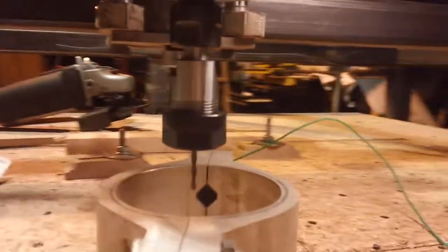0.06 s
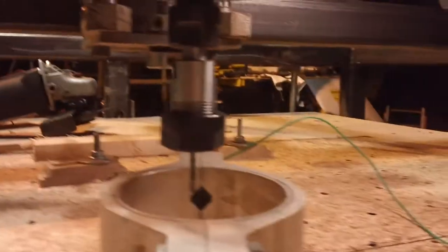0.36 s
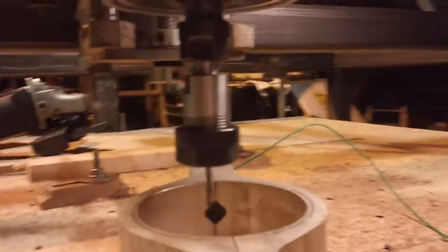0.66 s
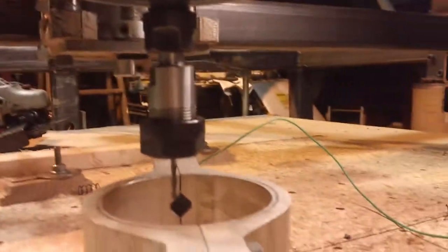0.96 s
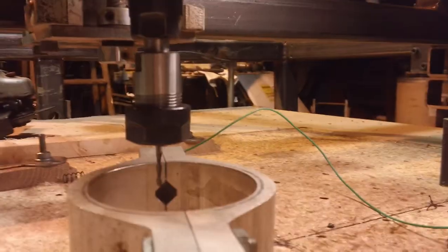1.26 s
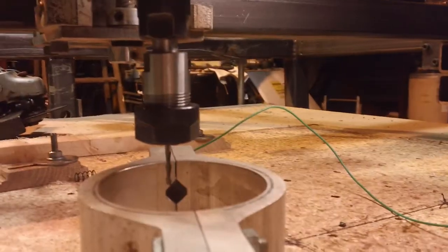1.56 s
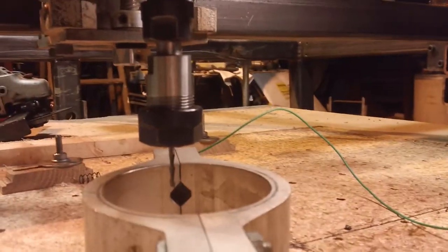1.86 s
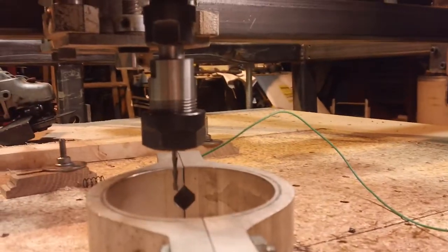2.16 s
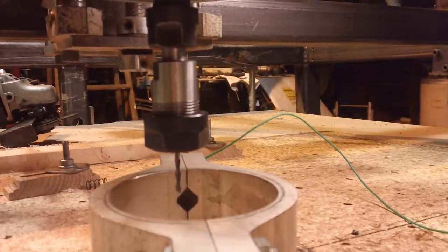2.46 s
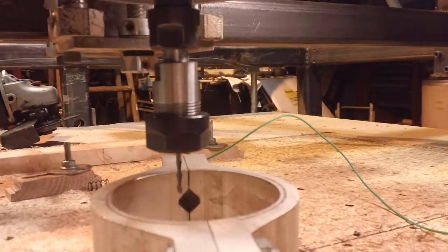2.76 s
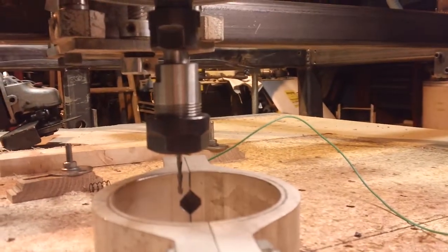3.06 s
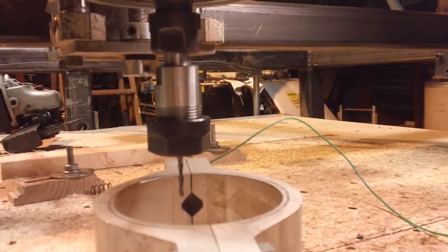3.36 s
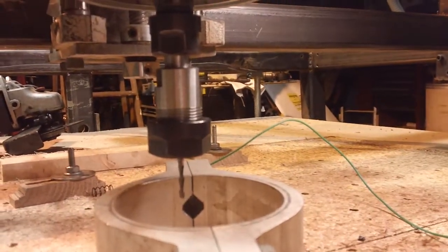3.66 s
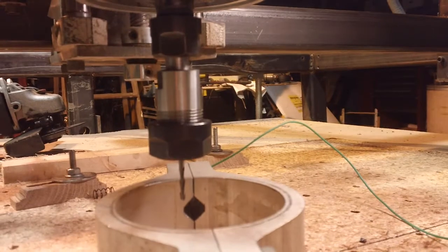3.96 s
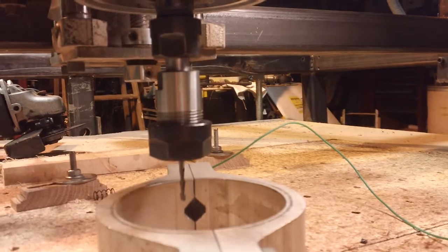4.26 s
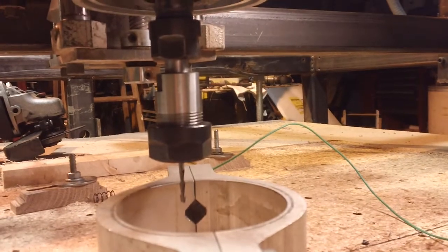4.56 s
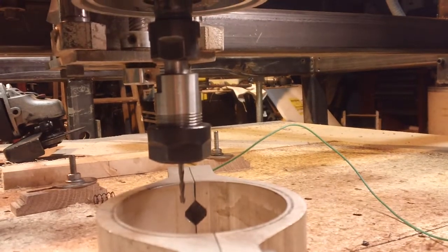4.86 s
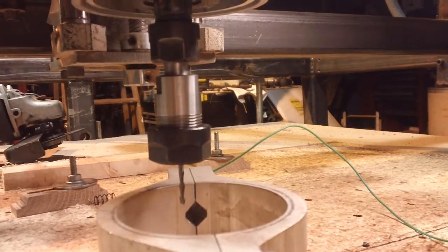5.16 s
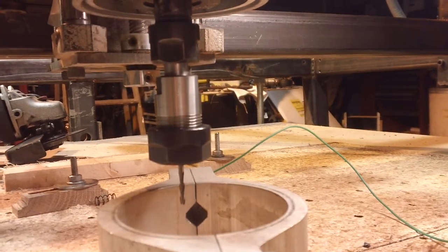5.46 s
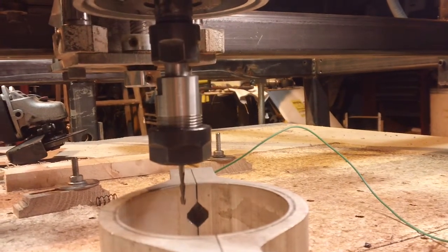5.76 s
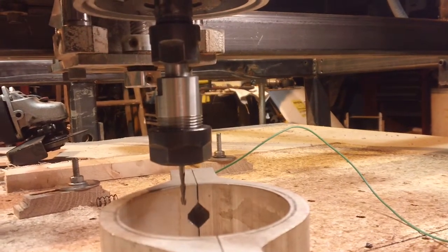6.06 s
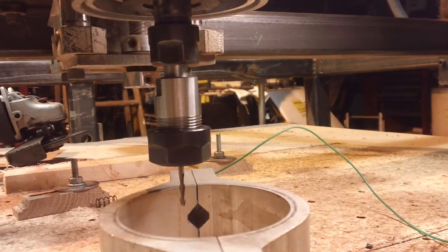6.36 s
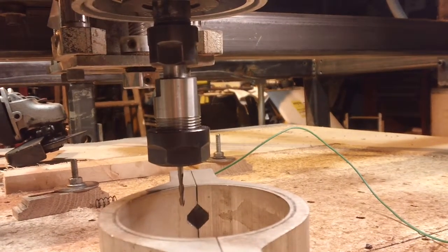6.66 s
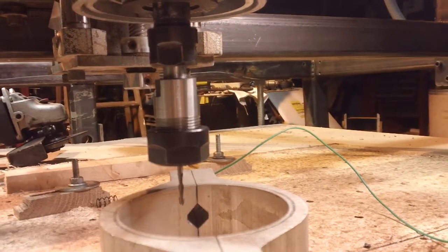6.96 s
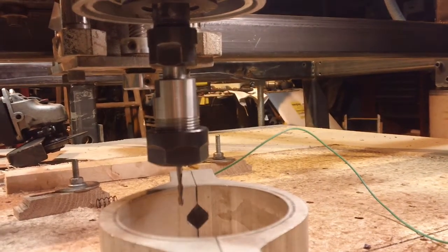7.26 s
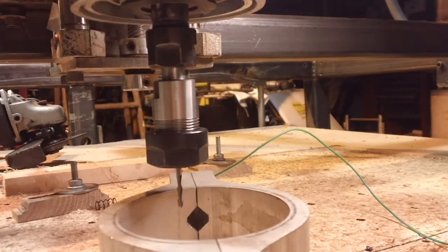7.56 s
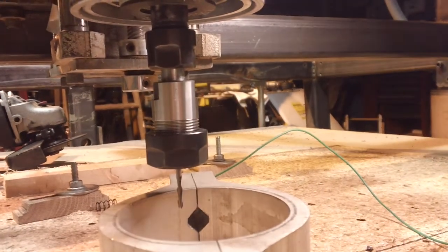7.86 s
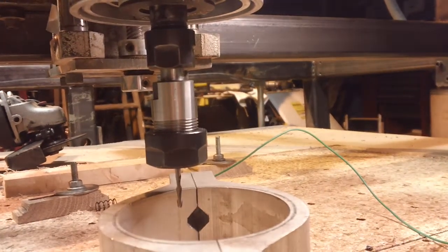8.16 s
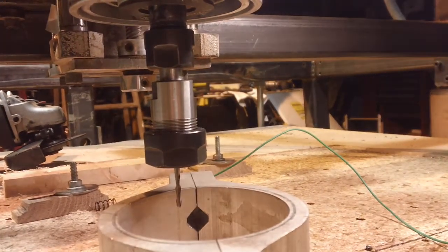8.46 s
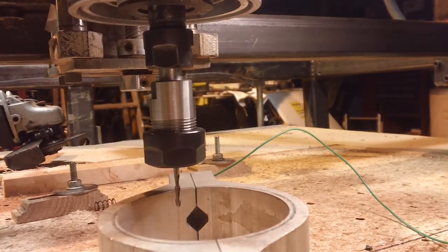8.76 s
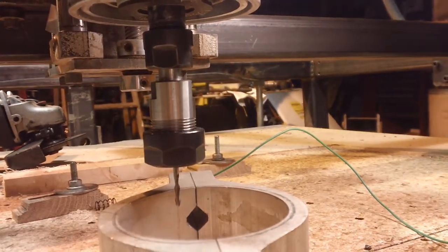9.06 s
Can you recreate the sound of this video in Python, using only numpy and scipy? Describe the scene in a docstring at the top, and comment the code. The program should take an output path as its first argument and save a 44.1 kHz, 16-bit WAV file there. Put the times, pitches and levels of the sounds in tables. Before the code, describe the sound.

The stepper motors of a small CNC machine sing one steady, slightly fluttering note throughout, heard close by in a workshop. The pitch never changes, only the strength. A few tiny bright ticks sound in the first second. The note swells and is loud from about 1 to 4 seconds, shaking loose metal into a buzz and a bright chatter. The slides rasp lightly from 1.5 to 3 seconds and more clearly around 4. The whine then falls away and the rattle fades, quietest near 5.7 seconds, though the motors keep running. From about 7 seconds the tone, buzz and chatter build again with more rubbing, peaking just after 8 seconds, then wavering in level until the end at around 9 seconds. Underneath are a low rolling of bearings, soft fan air and a faint hum.

```python
"""Stepper motors sing one steady note, close by, as a small CNC machine feeds slowly in a workshop.
The note is their step rate, and it flutters once in every drive cycle of eight steps.
Where they shake hardest, each step knocks loose metal into a buzz and a bright chatter.
Underneath, the slides roll and rub, a few tiny ticks sound early on, and the workshop hums."""
import sys
import numpy as np
from scipy import signal
from scipy.fft import rfft, irfft
from scipy.io import wavfile
from scipy.ndimage import uniform_filter1d

SR = 44100
rng = np.random.default_rng(int(sys.argv[2]) if len(sys.argv) > 2 else 0)


def inscribe(sig):
    """Save sig as 16-bit PCM at rate SR to the path in sys.argv[1].

    A 1-D sig is mono; a 2-D sig holds one channel per row.
    Samples are clipped to [-1, 1] before scaling.
    """
    pcm = np.round(np.clip(np.atleast_2d(sig).T, -1, 1) * 32767)
    wavfile.write(sys.argv[1], SR, pcm.astype(np.int16))


N = 406161
TIME = np.arange(N) / SR
FREQS = np.fft.rfftfreq(N, 1 / SR)
STEP_HZ, STEPS_PER_CYCLE = 270.62, 8

# The step tone, which follows the shaking as the load shifts: time_s, level_db
STEP_TONE = [(0.03, -26.5), (1.07, -21.5), (1.38, -19), (2.37, -18.5), (2.79, -20), (3.17, -19.5),
             (3.83, -20), (4.47, -30.5), (4.85, -30.5), (5.72, -40.5), (6.2, -31.5), (6.76, -28.5),
             (7.17, -21.5), (8.14, -17.5), (8.5, -25), (8.68, -20.5), (9.09, -27.5), (9.19, -22.5)]
# Body that grows with the shaking: step_multiple, steady_db, full_shake_db, growth_db_per_db
LOW_HARMONICS = [(2, -42, -66, 4), (3, -50.5, -46, 1), (5, -62.5, -44.5, 1.8), (6, -54, -48, 1.5)]
# The fourth harmonic swells and fades on its own: time_s, level_db
FOURTH_HARMONIC = [(0.03, -39), (0.77, -44.5), (1.23, -39.5), (2.4, -44.5), (2.79, -39), (3.24, -41),
                   (3.91, -38), (6.71, -47), (7.53, -37.5), (8.3, -45), (8.35, -39.5), (9.19, -38)]
# Stretches where the octave sings out: start_s, end_s, level_db
OCTAVE_SURGES = [(-.3, 2.42, -35.5), (7.38, 8.33, -34.5)]
# Steady upper whine: step_multiple, relative_db
WHINE = [(7, -67), (8, -58), (9, -54), (10, -62), (11, -71), (12, -61.5), (13, -66)]
# Torque ripple from uneven steps: cycle_multiple, relative_db
TORQUE_RIPPLE = [(2, -73), (9, -48.5), (13, -61), (14, -53.5), (15, -48), (17, -50.5), (18, -79),
                 (23, -54.5), (25, -48), (31, -65), (33, -56.5), (39, -59), (47, -58), (49, -70), (55, -57),
                 (63, -58)]

def motors(steps, swell_s=0.29):
    """The steppers sing in harmonics of the step rate; torque ripple beats against them."""
    cycles = steps / STEPS_PER_CYCLE
    harmonic_db = {round(k): driven_db(*law) for k, *law in LOW_HARMONICS}
    harmonic_db[4] = envelope(FOURTH_HARMONIC)
    swell = sum(gain_of(db) * np.clip(.5 + np.minimum(TIME - start, end - TIME) / swell_s, 0, 1)
                for start, end, db in OCTAVE_SURGES)
    harmonic_db[2] = 20 * np.log10(np.hypot(gain_of(harmonic_db[2]), swell))
    flutter_db = -34.5 - 4 * shaking(growth=4.5)  # gives way at full shake
    song = tone(steps, envelope(STEP_TONE), waver=0.031, tremble=0.011)
    song += tone(steps - cycles, flutter_db, waver=0.036, tremble=0.11)  # one beat a drive cycle
    song += sum(tone(k * steps, db, waver=0.16, tremble=0.07) for k, db in harmonic_db.items())
    song += sum(tone(round(k) * steps, db - 0.5, waver=0.19, tremble=0.096) for k, db in WHINE)
    song += sum(tone(round(k) * cycles, db - 4, waver=0.36, tremble=0.14) for k, db in TORQUE_RIPPLE)
    return song


def shaking(growth, full_shake_db=-19):
    """Gain that rises by `growth` dB per dB of shaking; 1 at full shake."""
    return gain_of(growth * (envelope(STEP_TONE) - full_shake_db))


def driven_db(steady_db, full_db, growth):
    """A steady part and a part driven by the shaking, added in power."""
    return 20 * np.log10(np.hypot(gain_of(steady_db), gain_of(full_db) * shaking(growth)))


# Buzzing resonances of the frame: pitch_hz, width_hz, relative_db
FRAME_MODES = [(1590, 110, -3), (1825, 106, -2.5), (1900, 70, -14), (2150, 64, -17), (2388, 48, 6),
               (2670, 94, -1.5), (3000, 89, -2.5), (3170, 60, -6), (3610, 150, -14.5)]

def frame_buzz(steps):
    """Each step knocks the frame: a faint throbbing buzz that builds as the shaking grows."""
    throb_db = 0.5 * np.cos(2 * np.pi * steps / 32)  # once in 32 steps
    hits = knocks(steps, jitter_ms=0.027, uneven_db=0, accent_db=2, grit=0.93, grit_decay_s=0.0012)
    buzz_db = driven_db(steady_db=-60.5 + throb_db, full_db=-41, growth=0.99)
    return gain_of(buzz_db) * ring(hits, FRAME_MODES)


# Bright resonances of small loose parts: pitch_hz, width_hz, relative_db
PART_MODES = [(4046, 86, 1.5), (4310, 150, -20), (4520, 120, -4.5), (5130, 116, -4), (5350, 300, -18),
              (6030, 360, -19), (8000, 1500, -33), (10660, 120, -11), (10820, 105, -10), (12980, 98, -4),
              (13280, 200, -26), (13750, 300, -22), (14300, 260, -16), (15050, 380, -20)]

def parts_chatter(steps, sizzle_hz=11400):
    """Small parts chatter under hard shaking; their top end dulls as the axis travels."""
    hits = knocks(steps, jitter_ms=0.028, uneven_db=-0.3, accent_db=1.3, grit=1.17, grit_decay_s=0.0028)
    chatter = ring(hits, PART_MODES)
    sizzle = irfft(rfft(chatter) / (1 + (sizzle_hz / (FREQS + 1)) ** 12), N)
    shelf_db = 5 - 1.5 * TIME
    chatter += sizzle * (gain_of(shelf_db) - 1)
    return gain_of(-46.5) * shaking(growth=1.4) * chatter


def knocks(steps, jitter_ms, uneven_db, accent_db, grit, grit_decay_s):
    """One contact a step, accented once a drive cycle, each with a short gritty slip after it."""
    at = np.flatnonzero(np.diff(np.floor(steps)) > 0)
    late, strength = rng.standard_normal((len(at), 2)).T
    accent = np.cos(2 * np.pi * steps[at] / STEPS_PER_CYCLE)
    force = gain_of(uneven_db * strength + accent_db * accent + 0.81 * drift(7.3)[at])
    seat_ms = .06 * drift(2)[at]  # the contact point wanders as the axis moves
    delay = np.round((jitter_ms * late + seat_ms) * SR / 1000).astype(int)
    clicks = np.bincount(np.clip(at + delay, 0, N - 1), force, N)
    tails = signal.lfilter([1], [1, -np.exp(-1 / (grit_decay_s * SR))], clicks)
    slip = tails * rng.standard_normal(N)
    return unit_rms(clicks) + grit * unit_rms(slip)


def ring(hits, modes):
    """Hits ring a metal body whose resonances add in power."""
    hz = abs(np.fft.fftfreq(8192, 1 / SR))
    power = sum(gain_of(db) ** 2 / (1 + (2 * (hz - pitch) / width) ** 2) for pitch, width, db in modes)
    power /= 1 + (modes[0][0] / (1.14 * hz + 1)) ** 12  # little radiates under the lowest mode
    log_gain = np.log(power + 1e-10) / 2
    response = np.fft.ifft(np.exp(np.conj(signal.hilbert(log_gain)))).real  # minimum phase
    return unit_rms(signal.oaconvolve(hits, response[:len(hz) // 2])[:N])


# Low rumble of screws and bearings: frequency_hz, relative_db
ROLL_EQ = [(110, -36), (200, -29), (245, 4), (300, 1), (400, -9.5), (560, -9.5), (740, -7.5), (880, -19),
           (980, -10.5), (1150, -18), (1600, -13.5), (2100, -23), (4000, -46)]
# Rough stretches of the slide: start_s, end_s, level_db
ROUGH_STRETCHES = [(1.45, 3.1, -47.5), (3.718, 4.14, -42.5), (7.097, 7.38, -47.5), (7.39, 7.617, -45),
                   (7.618, 8.3, -50)]
# Rasp of those stretches: frequency_hz, relative_db
RUB_EQ = [(900, -22), (1800, 6), (2800, 0.5), (3600, 0.5), (4600, -10), (5200, 0), (6000, -17), (7200, -18),
          (8200, -7.5), (9400, -21), (10300, -14), (11500, -28), (15000, -25)]

def slides(steps):
    """Bearings roll in surges with the drive cycle and rub over rough stretches."""
    surge = 1 + 0.31 * np.cos(2 * np.pi * steps / STEPS_PER_CYCLE)
    roll = gain_of(-39.5 + drift(8.9)) * surge * noise(ROLL_EQ)
    rough = sum(gain_of(db) * ((TIME > start) & (TIME < end)) for start, end, db in ROUGH_STRETCHES)
    rough = uniform_filter1d(rough, size=1200)  # soften the edges
    step_pulse = 1 + 0.21 * np.cos(2 * np.pi * steps)
    rub = rough * step_pulse * gain_of(1.06 * drift(40)) * noise(RUB_EQ)
    return roll + rub


# Light ticks in the first second: start_s, relative_db, decay_s
TICK_HITS = [(.13, -46, .012), (.165, -43, 0.013), (.322, -35, .0012), (.553, -41, .0012),
             (.631, -39, .0012)]
# Their thin, bright tone: frequency_hz, relative_db
TICK_EQ = [(3000, -30), (7000, -4), (12000, -10), (14000, -5), (15500, -1)]

def ticks():
    """Tiny bursts of bright noise that start sharply and die at once."""
    bursts = sum(gain_of(db) * (TIME >= start) * np.exp(-abs(TIME - start) / decay)
                 for start, db, decay in TICK_HITS)
    return gain_of(-3) * bursts * noise(TICK_EQ)


# Workshop air and cooling fans: frequency_hz, relative_db
AIR_EQ = [(15, -16), (50, -10), (140, 0.5), (600, -2.5), (1500, -10.5), (2150, -12), (2600, -2),
          (3100, -15), (3600, -13), (4600, -15.5), (7000, -19), (11000, -25.5), (13300, -32), (14800, -26)]
# Low steady hum: pitch_hz, level_db
HUM_TONES = [(67.7, -61.5), (120, -55)]

def workshop():
    """A soft bed of fan air over a low hum."""
    air = gain_of(-44 + 0.32 * drift(12)) * noise(AIR_EQ)
    return air + sum(tone(hz * TIME, db, waver=0.13, tremble=0.09) for hz, db in HUM_TONES)


def tone(turns, db, waver, tremble):
    """One partial with a slow waver and a quick tremble in level and phase."""
    sway = 1 + waver * (drift(2.1) + 1j * drift(3)) + tremble * (drift(25) + 1j * drift(30))
    carrier = np.exp(2j * np.pi * (turns + rng.random()))
    return np.sqrt(2) * gain_of(db) * (sway * carrier).real


def noise(eq):
    """Noise shaped by an EQ curve, at unit RMS."""
    hz, db = np.transpose(eq)
    gain = gain_of(np.interp(np.log(FREQS + 1), np.log(hz), db))
    return unit_rms(irfft(rfft(rng.standard_normal(N)) * gain, N))


def drift(rate_hz):
    """Smooth random wander of about unit size, mostly slower than rate_hz."""
    grid = np.arange(0, 10, 1 / 500)
    hz = np.fft.rfftfreq(len(grid), 1 / 500)
    slow = irfft(rfft(rng.standard_normal(len(grid))) / (1 + (hz / rate_hz) ** 2), len(grid))
    return np.interp(TIME, grid, unit_rms(slow))


def envelope(points):
    """Straight ramps between (time_s, level_db) points."""
    return np.interp(TIME, *np.transpose(points))


def gain_of(db):
    return 10 ** (np.asarray(db) / 20)


def unit_rms(x):
    return x / np.sqrt(np.mean(x ** 2) + 1e-20)


def scene():
    """One step count drives the motors, rattles and slides; ticks and room join them in mono."""
    steps = STEP_HZ * TIME + .004 * drift(5.7)  # the rotor lags a little with the load
    machine = motors(steps) + frame_buzz(steps) + parts_chatter(steps) + slides(steps)
    return (machine + ticks() + workshop())[None]


def record(dry, notch_hz=12520, notch_half_width_hz=330, cutoff_hz=15300):
    """The microphone has one narrow notch in the top treble; a steep low-pass follows."""
    offset_hz = FREQS - notch_hz
    notched = irfft(rfft(dry) * offset_hz ** 2 / (offset_hz ** 2 + notch_half_width_hz ** 2), N)
    lowpass = signal.firwin(1023, cutoff_hz, window=("kaiser", 9), fs=SR)
    return signal.oaconvolve(notched, lowpass[None], "same")


dry = scene()
out = record(dry)
inscribe(out)
```